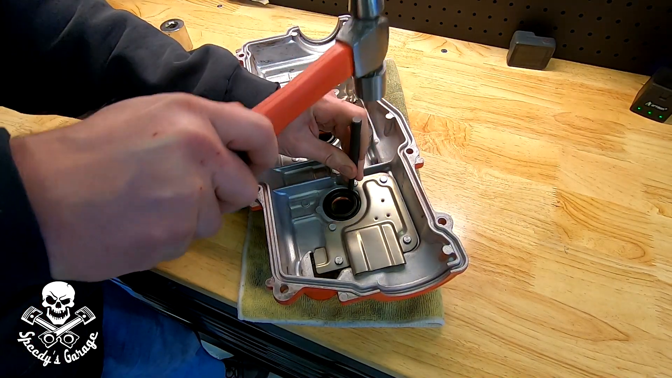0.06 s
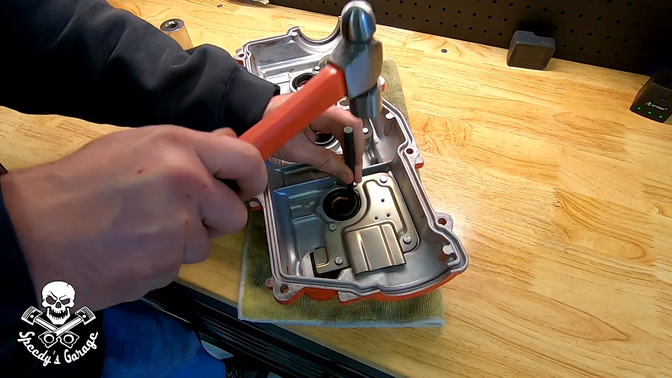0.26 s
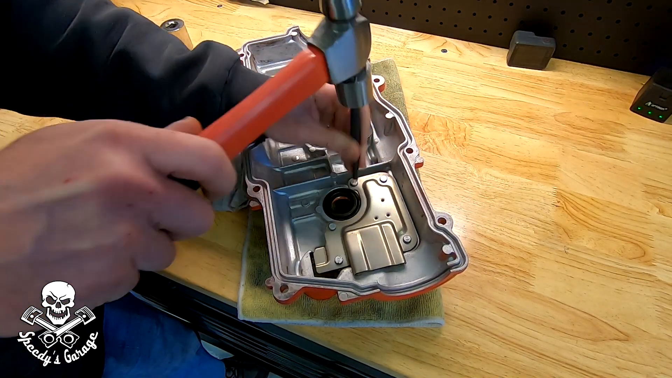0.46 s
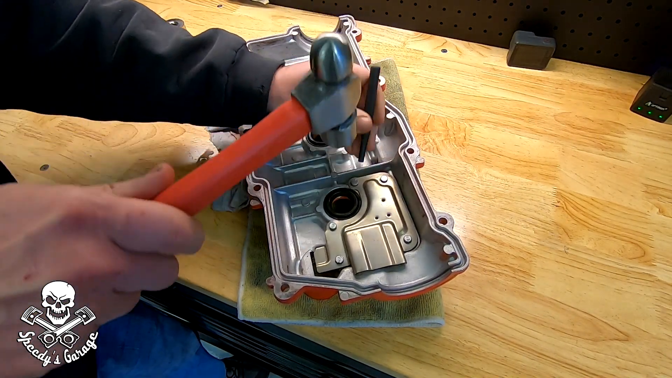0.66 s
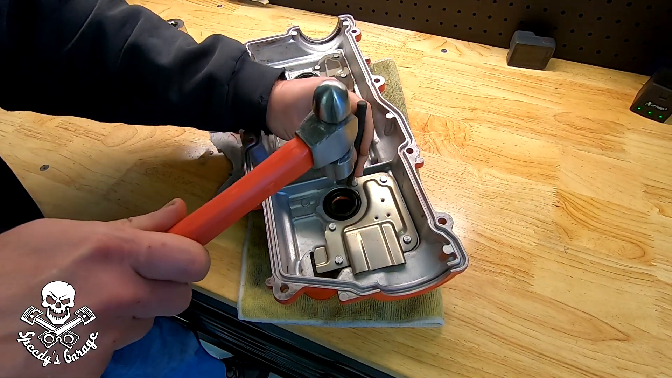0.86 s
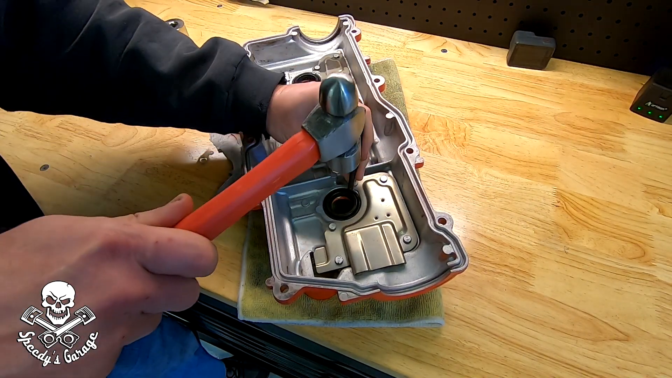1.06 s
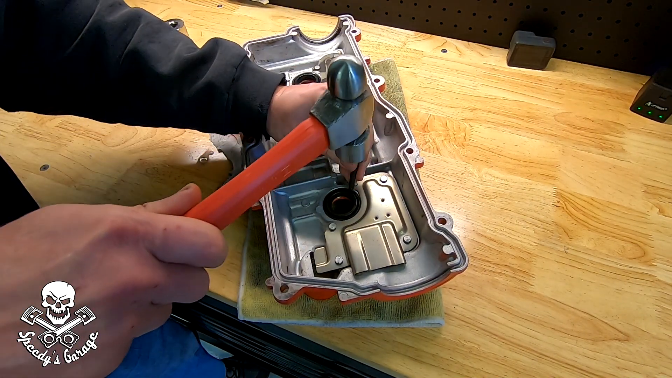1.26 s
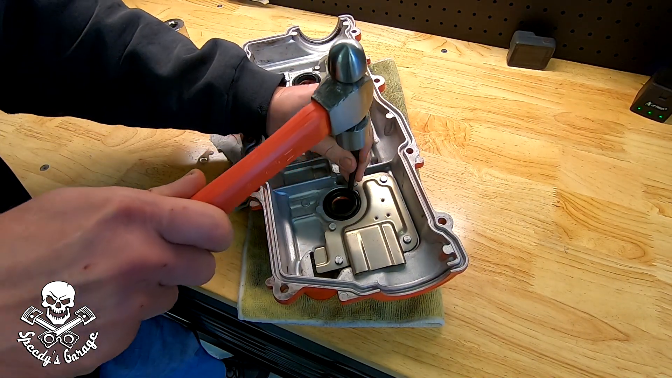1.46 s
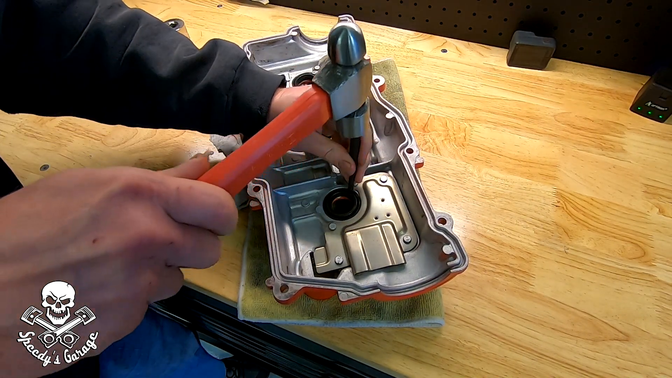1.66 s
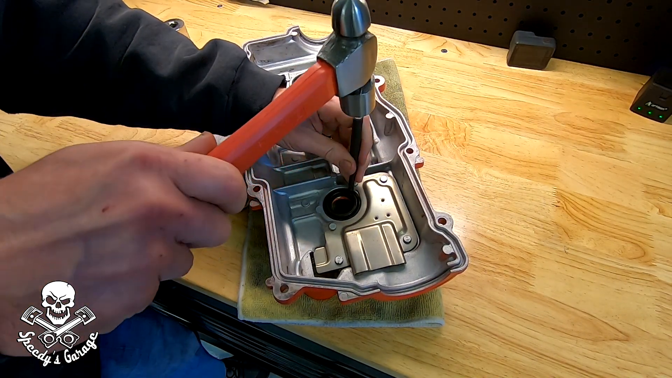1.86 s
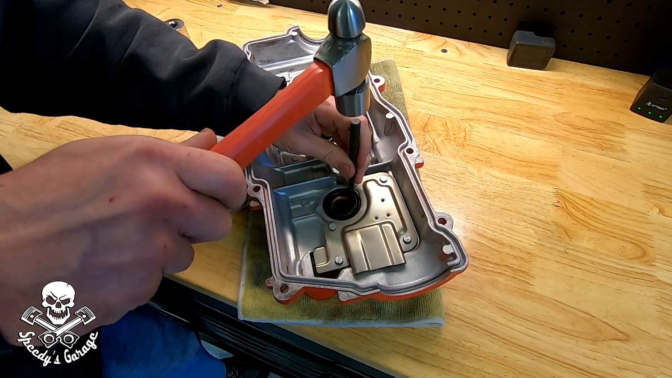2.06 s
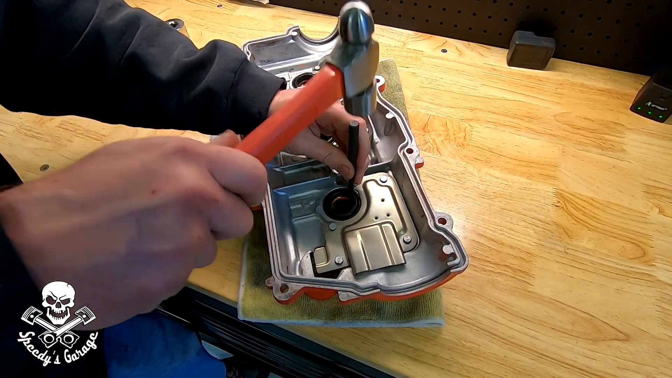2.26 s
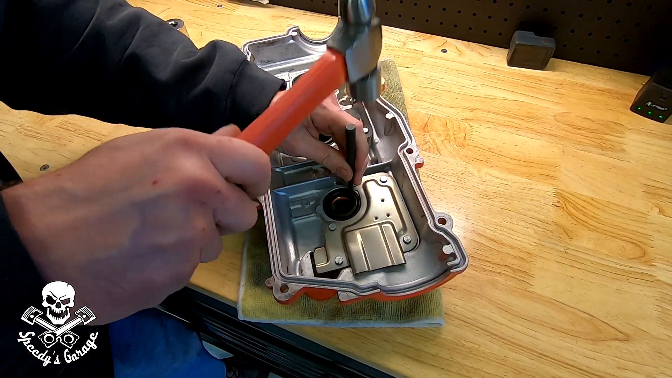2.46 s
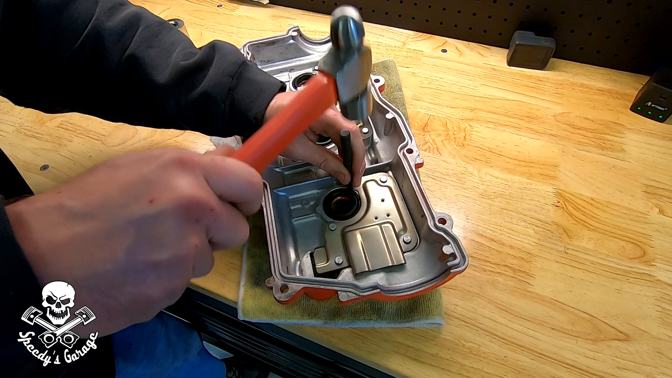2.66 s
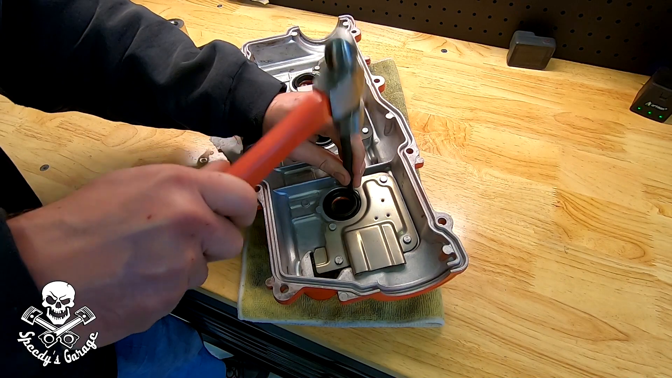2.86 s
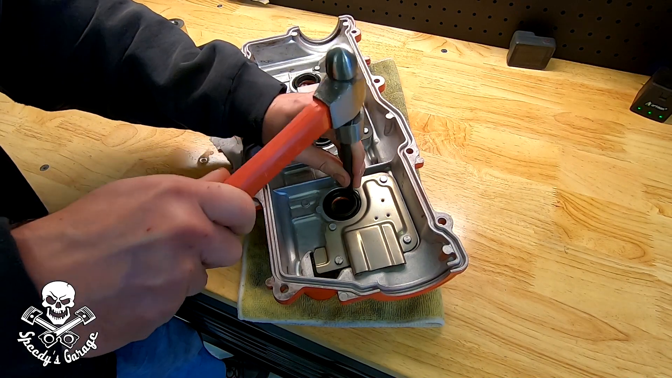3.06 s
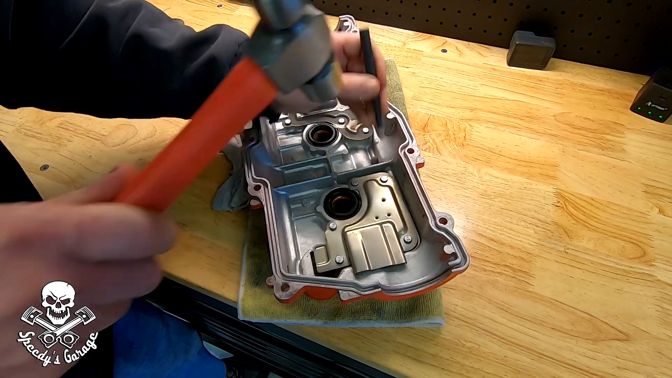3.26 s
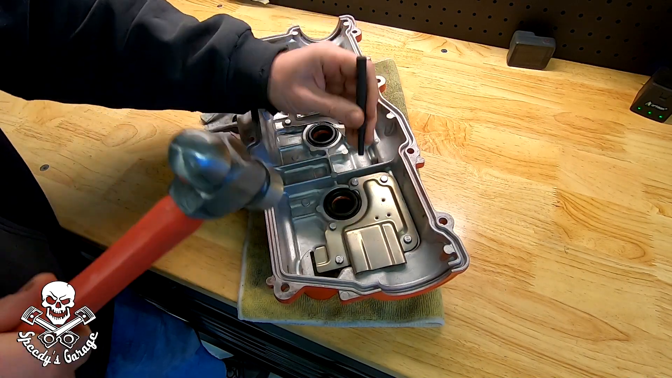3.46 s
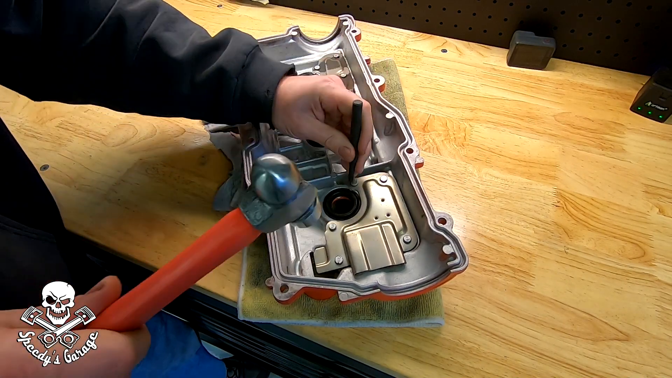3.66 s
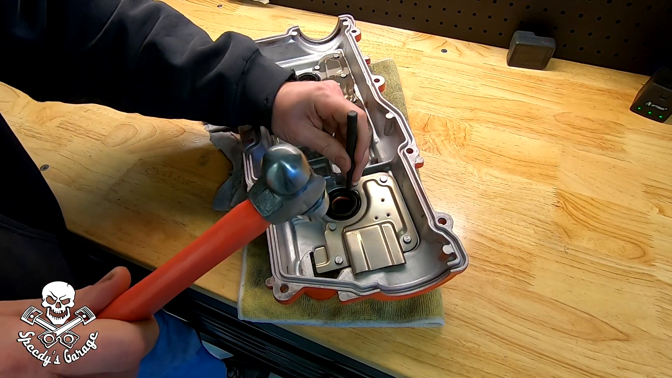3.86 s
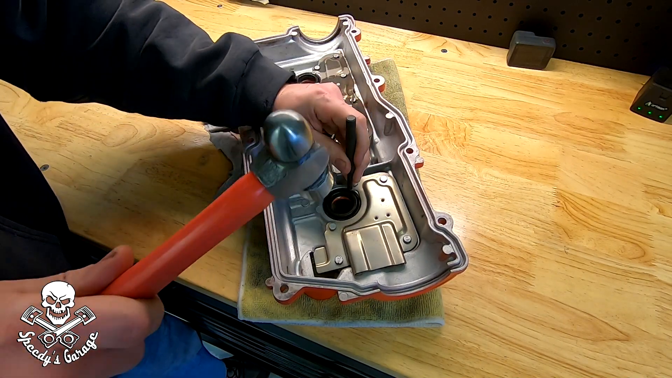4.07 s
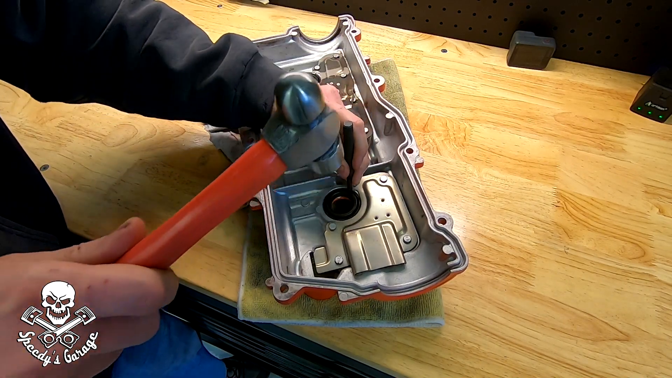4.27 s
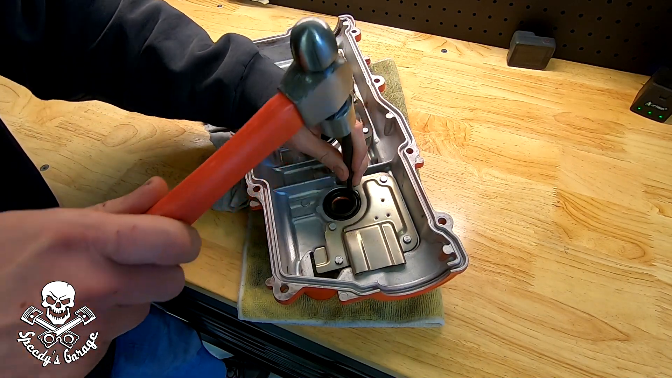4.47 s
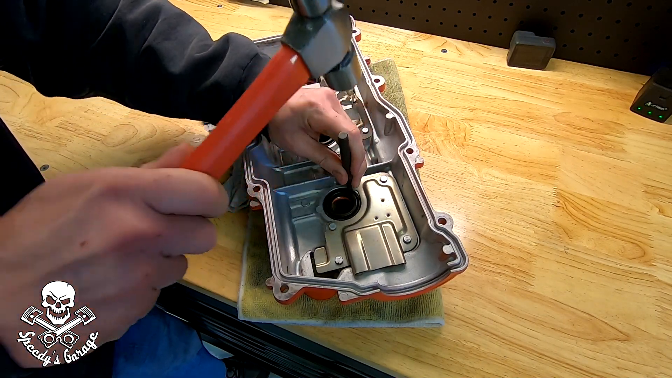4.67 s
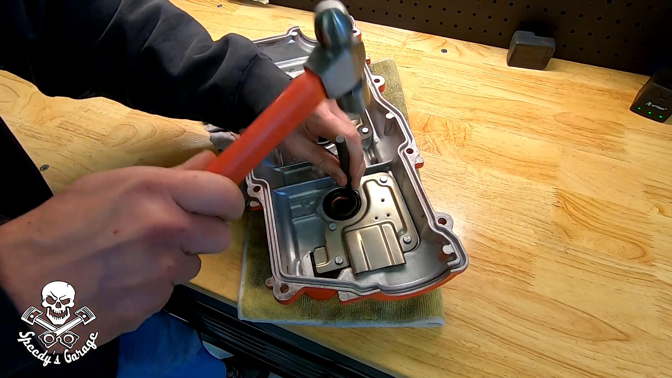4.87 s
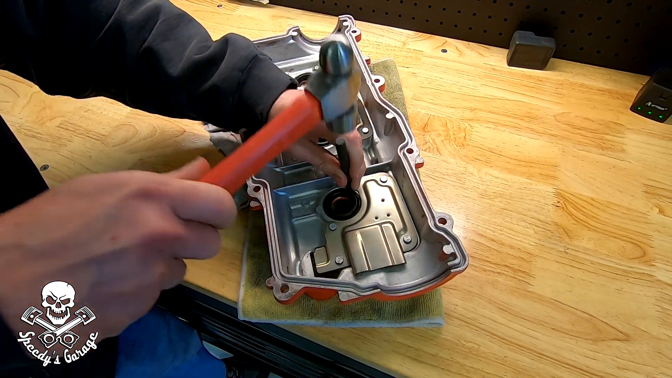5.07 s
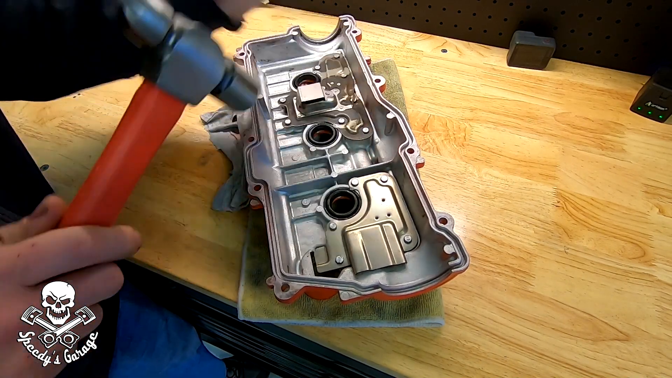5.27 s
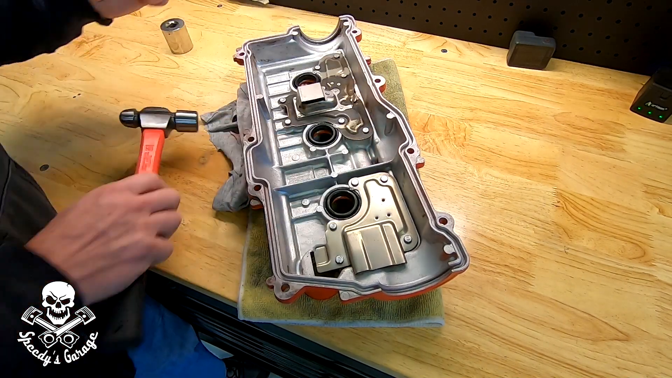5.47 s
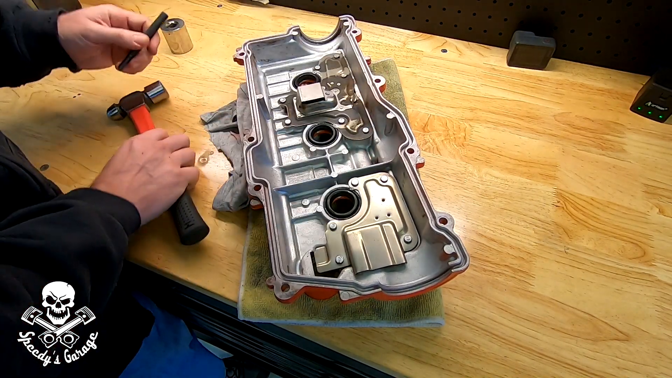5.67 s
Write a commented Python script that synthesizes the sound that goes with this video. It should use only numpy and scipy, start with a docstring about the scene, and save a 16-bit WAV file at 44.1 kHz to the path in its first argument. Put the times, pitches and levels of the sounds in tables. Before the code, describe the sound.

A hammer taps a steel punch inside a cast aluminium engine cover on a wooden workbench. Three quick metallic taps come first, then a pause, then five more at an even pace. After another pause come two last taps, the second ringing a little longer. The hammer is laid on the bench with a dull knock. The sound is close, with a short workshop echo and a faint hum behind it.

```python
"""In a quietly humming workshop, a hammer taps a steel punch inside a cast aluminium engine cover,
which lies on a rag on a wooden bench. Each blow rings the cover, thumps the bench and echoes.
Three taps open the scene, the first already dying away, and the punch is set down softly.
Five more taps follow, then a hand nudges the bench. Of the last two taps, the second lands on
a freer spot of the cover and rings on. Finally the hammer is laid on the bench with a dull knock."""
import sys
import numpy as np
from scipy import signal
from scipy.fft import rfft, irfft, next_fast_len
from scipy.io import wavfile

SR = 44100
rng = np.random.default_rng(int(sys.argv[2]) if len(sys.argv) > 2 else 0)


def materialize(psi):
    """Save the field psi as 16-bit PCM at rate SR to the path in sys.argv[1].

    A 1-D psi becomes a single channel; in a 2-D psi each row is a channel.
    """
    bounded = np.clip(np.atleast_2d(psi).T, -1, 1)
    quanta = np.round(bounded * 32767).astype(np.int16)
    wavfile.write(sys.argv[1], SR, quanta)


N = 251590
LEAD = SR // 4  # samples before the start, so a blow can already be ringing

# Background rumble and hiss: pitch_hz, level_db
AIR_SPECTRUM = [(15, -31), (25, 1.5), (53, -2), (80, -9.5), (114, -14.5), (175, -7), (206, -15),
                (384, -17.5), (416, -17.5), (1040, -23.5), (1520, -25), (14800, -35.5), (16000, -40)]
# Tone of the room's echo: pitch_hz, level_db
ECHO_SPECTRUM = [(70, -6.5), (130, -3.5), (230, -1.5), (420, 4), (750, 2.5), (1600, -0.5), (2800, 4),
                 (5000, 0.5), (8000, -5.5), (15000, -3.5)]
# How long the echo rings (a ring time is the time to fade by 60 dB): pitch_hz, ring_s
ECHO_RING = [(60, 1), (150, 0.81), (250, 0.81), (390, 0.68), (750, 0.91), (1100, 0.96), (1700, 0.98),
             (2900, 1), (5000, 0.9), (8000, 0.65), (14000, 0.72)]
# A hand nudges the bench: start_s, level_db
NUDGES = [(3.723, -47.5)]
# The hammer is laid on the bench: start_s, level_db
HAMMER_DOWN = [(5.668, -8)]
# Tone of a knock on wood: pitch_hz, level_db
WOOD_SPECTRUM = [(25, -47), (70, -18), (200, -6), (480, -0.5), (800, -6), (1600, -13), (2200, -21.5),
                 (2900, -39.5), (4300, -27), (6500, -56), (12000, -77.5)]
# How long that knock rings: pitch_hz, ring_s
WOOD_RING = [(100, 0.074), (600, 0.037), (2000, 0.038), (8000, 0.032)]
# The bench's modes (the tones it makes when struck): pitch_hz, level_db, ring_s
BENCH_MODES = [(74.6, -22, 0.18), (130.2, -21, 0.16), (205, -34.5, .08), (347.4, -16.5, 0.096),
               (370, -20.5, 0.12), (452, -22, 0.058)]
# Clatter of the cover's many crowded modes: pitch_hz, level_db
CLATTER_SPECTRUM = [(30, -11), (100, 0.5), (400, 5), (800, -1.5), (1330, -4), (1600, -4.5), (2050, -13),
                    (2400, -15.5), (2900, -9), (3600, -12), (4200, -9), (5200, -11.5), (5800, -14.5),
                    (9500, -11.5), (12000, -24), (16000, -26)]
# How long the clatter rings: pitch_hz, ring_s
CLATTER_RING = [(100, 0.25), (500, 0.12), (2000, 0.13), (5000, 0.021), (12000, 0.022)]
# Clear modes of cover and punch: pitch_hz, level_db, base_ring_s, to_room_db, free_wall_gain_db
METAL_MODES = [(569, -24.5, 0.087, -9, -2), (663, -23, 0.032, -13, -0.5), (906, -33, 0.074, -3, 17.5),
               (945.6, -34, 0.2, 5, 16), (1085, -9, .11, -8, 3), (1135, -35.5, 0.33, 3, 14),
               (1223, -38, 0.22, 1, 15), (1626.4, -15.5, 0.095, 0, 1.5), (1739.4, -32, .1, 2.5, -5),
               (1893, -25, 0.13, -6, -11), (2205, -35, 0.17, 0.5, -3.5), (2306, -27.5, 0.035, 0.5, -1.5),
               (2787, -17.5, 0.06, -2.5, -4), (3048, -18.5, 0.04, -7, -6), (3500, -28, 0.01, -5.5, -7),
               (4083, -13.5, 0.046, -11.5, -3), (4380, -25, 0.059, -0.5, -6), (4570, -23.5, 0.075, -10, -8),
               (5094, -13.5, 0.029, -9.5, -15), (6690, -28.5, .018, -13.5, 10),
               (6770, -29, 0.034, -15, 10.5), (7240, -31.5, 0.031, -3.5, 8), (7170, -33, 0.029, -9, -2.5),
               (8850, -27.5, 0.019, -13, 0.5), (8930, -32.5, .028, -9, -1.5), (9300, -34, 0.053, -5.5, 0.5)]
# Blows on the punch: start_s, level_db, hardness_db, spot, clank_db
# Spot 0 is a stiff rib and 1 a free wall. The faintest entry is the punch being set down.
BLOWS = [(-.04, 0, 0, -0.66, 0), (0.1495, -0.5, 2, -0.19, 3.5), (0.3401, -2, 2, 0.034, 5),
         (1.671, -44, 0, 1, -7), (2.3456, 1.5, -1.5, -0.21, 2), (2.5508, -4, 5, -0.18, 1.5),
         (2.7323, 1.5, 0.5, -0.12, -1.5), (2.9176, 1.5, 1, 0, -1), (3.1100, 0.63, 2, -.1, -4),
         (4.7995, 4.5, -2, -0.067, -0.5), (5.0358, -1.5, 7.5, 0.97, 1.5)]


def amp(db):
    """Turn decibels into a gain."""
    return 10 ** (np.asarray(db) / 20)


def unit(x):
    """Scale a sound to an average (rms) level of 1."""
    return x / np.sqrt(np.mean(x ** 2) + 1e-20)


def along(points, hz):
    """Read between a table's (pitch, value) rows on a log pitch scale."""
    pitches, values = np.transpose(points)
    return np.interp(np.log(hz + 1), np.log(pitches + 1), values)


def filtered(x, response):
    """Scale each frequency in x by the gain response(hz)."""
    size = x.shape[-1]
    padded = next_fast_len(size + 8192)
    return irfft(rfft(x, padded) * response(np.fft.rfftfreq(padded, 1 / SR)), padded)[..., :size]


def low_pass(hz, corner_hz, order):
    """A gain that is flat below the corner and falls above it."""
    return 1 / np.sqrt(1 + (hz / corner_hz) ** (2 * order))


def add(track, start_s, sound):
    """Mix a sound into a track at its start time."""
    part = track[..., LEAD + round(start_s * SR):][..., :sound.shape[-1]]
    part += sound[..., :part.shape[-1]]


def tones(hz, t):
    """One sine wave per row, each at a random phase."""
    return np.sin(2 * np.pi * (hz[:, None] * t + rng.random((len(hz), 1))))


def rise(t, attack_s):
    """A quick fade-in: vibration needs a moment to spread through a body."""
    return 1 - np.exp(-t / attack_s)


def fade(ring_s, t):
    """One fade-out per row, falling 60 dB in its ring time."""
    return np.exp(-np.log(1000) * t / ring_s[:, None])


def dying_noise(spectrum, ring_times, t):
    """Shaped noise in which each half-octave band dies at its own speed."""
    hz = np.fft.rfftfreq(len(t), 1 / SR)
    phases = np.exp(2j * np.pi * rng.random(len(hz)))
    noise = rfft(unit(irfft(phases * amp(along(spectrum, hz)), len(t))))
    centres_hz = np.geomspace(40, 16000, 18)
    bands = [irfft(noise * along(np.c_[centres_hz, pick], hz), len(t)) for pick in np.eye(18)]
    return np.sum(bands * fade(along(ring_times, centres_hz), t), axis=0)


def background(air_db=-66, hum_hz=113, width_hz=14, hum_db=-69):
    """Quiet room rumble and hiss, with a wavering hum made of a narrow band of noise."""
    air = unit(filtered(rng.standard_normal(N), lambda f: amp(along(AIR_SPECTRUM, f))))
    hum = unit(filtered(rng.standard_normal(N), lambda f: 1 / (1 + ((f - hum_hz) / width_hz) ** 2)))
    return amp(air_db) * air + amp(hum_db) * hum


def workshop_echo(x, gap_s=0.004, build_s=0.016, wall_s=0.04, spread_s=0.01, wall_db=3):
    """The walls answer after a short gap with a dense tail; the far wall adds a swell."""
    t = np.arange(SR) / SR
    swell = amp(wall_db * np.exp(-((t - wall_s) / spread_s) ** 2))
    build_up = 1 - np.exp(-(np.maximum(t - gap_s, 0) / build_s) ** 2)
    tail = dying_noise(ECHO_SPECTRUM, ECHO_RING, t) * swell * build_up
    return signal.fftconvolve(x, tail / np.linalg.norm(tail))[:len(x)]


def bench_knocks():
    """The hammer knocks dully on the wood; a soft nudge stirs mainly the bench's lowest modes."""
    out, t = np.zeros(LEAD + N), np.arange(SR // 2) / SR
    for start_s, level_db in HAMMER_DOWN:
        knock = dying_noise(WOOD_SPECTRUM, WOOD_RING, t) * rise(t, attack_s=0.00038)
        add(out, start_s, amp(level_db) * knock)
    hz, _, ring_s = np.transpose(BENCH_MODES)
    for start_s, level_db in NUDGES:
        bump = (hz[0] / hz) ** 2 @ (tones(hz, t) * fade(ring_s, t))
        add(out, start_s, amp(level_db) * bump * rise(t, attack_s=0.0032))
    return out


def bench_thump(t):
    """A blow passes through the cover and rings the bench below."""
    hz, level_db, ring_s = np.transpose(BENCH_MODES)
    return amp(level_db) @ (tones(hz, t) * fade(ring_s, t)) * rise(t, attack_s=0.0025)


def cover_clatter(t, length_s=0.08):
    """Many overlapping modes: dying noise, evened out so that no single tone stands out."""
    burst = dying_noise(CLATTER_SPECTRUM, CLATTER_RING, t)
    spectrum = rfft(burst)
    ripple = np.abs(spectrum) / amp(along(CLATTER_SPECTRUM, np.fft.rfftfreq(len(t), 1 / SR)))
    even = irfft(spectrum / (ripple + 1e-9), len(t)) * np.exp(-(t / length_s) ** 2)
    return even * np.linalg.norm(burst) / np.linalg.norm(even)


def steel_contact(x, level_db, hardness_db, spot, base_hz=11200, db_per_octave=34, treble_hz=6000):
    """A harder hit is louder and brighter, up to a pitch set by how long the steel faces touch."""
    corner_hz = base_hz * 2 ** (level_db / db_per_octave - 0.34 * spot)  # the free wall gives way

    def response(hz):
        boost_db = hardness_db * (2 - low_pass(hz, treble_hz, order=8))  # counts twice in the treble
        return amp(level_db + boost_db) * low_pass(hz, corner_hz, order=5)
    return filtered(x, response)


def hammer_taps(clatter_db=-13, seating_db=-15, scatter_db=1, clank_hz=1690, clank_width_hz=110):
    """Each blow rings the same metal and bench; row 0 is heard directly, row 1 goes into the room."""
    out, t = np.zeros((2, LEAD + N)), np.arange(SR // 2) / SR
    hz, mode_db, base_ring_s, to_room_db, free_wall_db = np.transpose(METAL_MODES)
    clank = np.exp(-((hz - clank_hz) / clank_width_hz) ** 2)  # modes touchy about the punch's place
    metal_tones = tones(hz, t) * rise(t, attack_s=0.00094)
    bench = bench_thump(t)
    shared_clatter = cover_clatter(t)
    for start_s, level_db, hardness_db, spot, clank_db in BLOWS:
        # where the punch stands decides how long and how strongly each mode rings
        modes = metal_tones * fade(base_ring_s * 0.88 * np.exp(-0.086 * spot), t)
        chance_db = scatter_db * rng.standard_normal(len(hz))
        strength = amp(mode_db + spot * free_wall_db + clank_db * clank + chance_db)
        # a light touch mostly rings the thin walls; a real blow also shakes the whole cover and bench
        shake = amp(0.1 * level_db)
        thump = shake * bench
        seating = amp(seating_db) * cover_clatter(t)  # the punch never sits the same way twice
        clatter = shake * amp(clatter_db) * (shared_clatter + seating) * rise(t, attack_s=0.0011)
        direct = strength @ modes + clatter + thump
        to_room = (strength * amp(to_room_db)) @ modes + amp(1) * clatter + amp(-1) * thump
        add(out, start_s, steel_contact(np.array([direct, to_room]), level_db, hardness_db, spot))
    return out


def scene(echo_db=-8):
    """Mix the taps, the knocks, their echo and the background into one channel."""
    direct, to_room = hammer_taps()
    knocks = bench_knocks()
    sound = direct + knocks + amp(echo_db) * workshop_echo(to_room + knocks)
    return (sound[LEAD:] + background())[None]


def record(dry, ceiling=0.95, top_hz=15700):
    """Round off the tallest peaks and cut the very highest treble."""
    rounded = dry / (1 + np.abs(dry / ceiling) ** 8) ** (1 / 8)
    return filtered(rounded, lambda f: low_pass(f, top_hz, order=70))


dry = scene()
out = record(dry)
materialize(out)
```